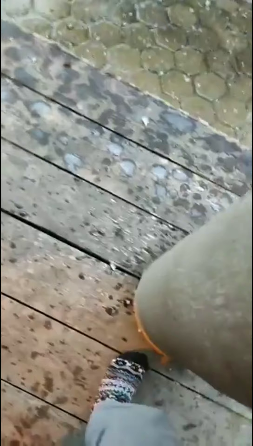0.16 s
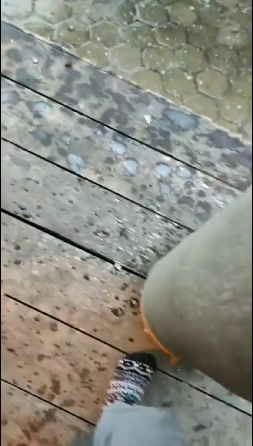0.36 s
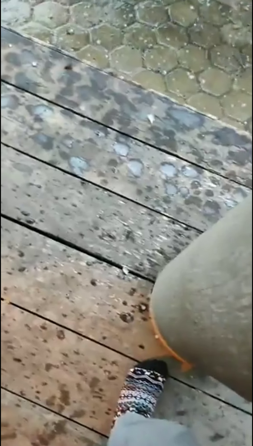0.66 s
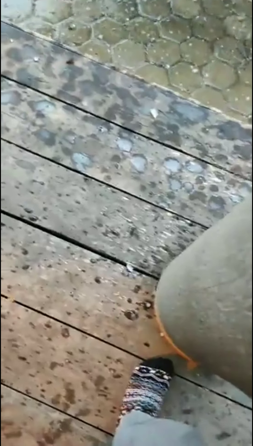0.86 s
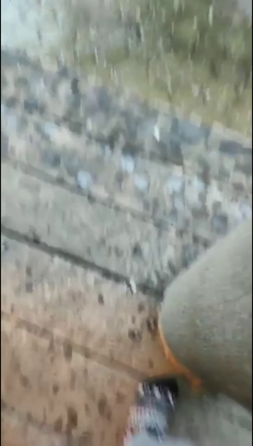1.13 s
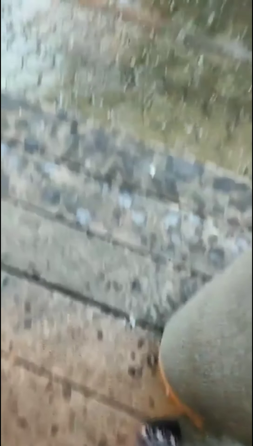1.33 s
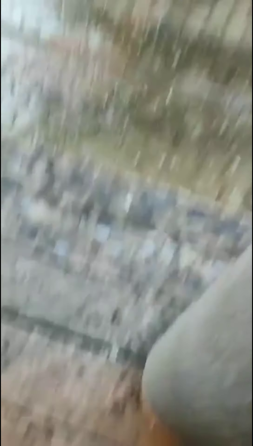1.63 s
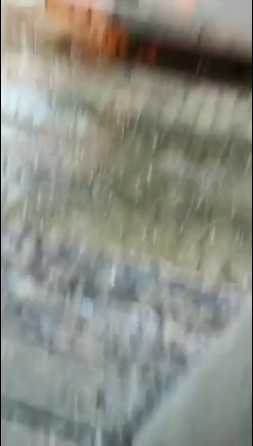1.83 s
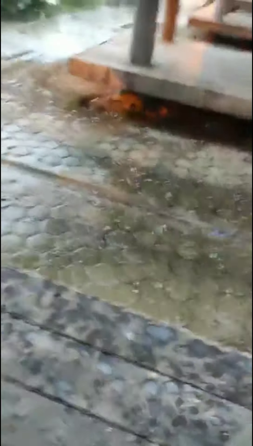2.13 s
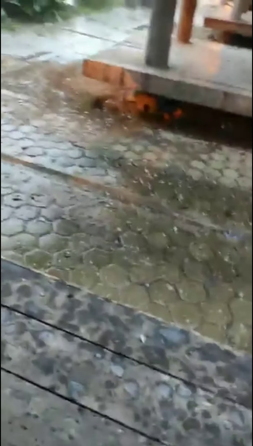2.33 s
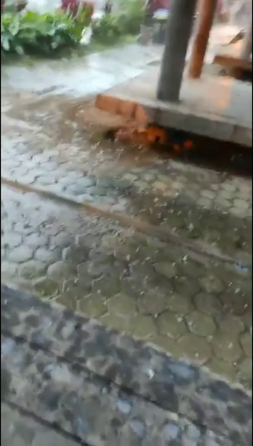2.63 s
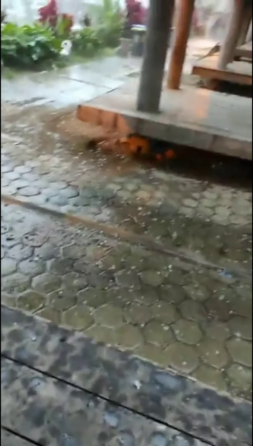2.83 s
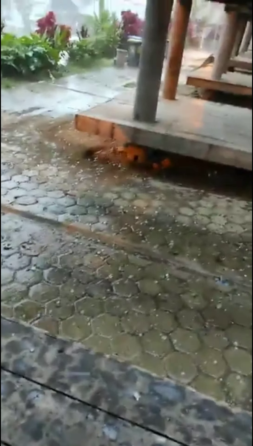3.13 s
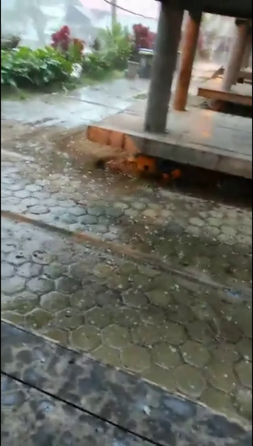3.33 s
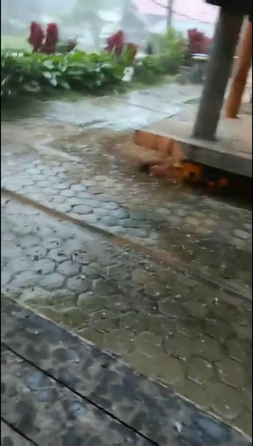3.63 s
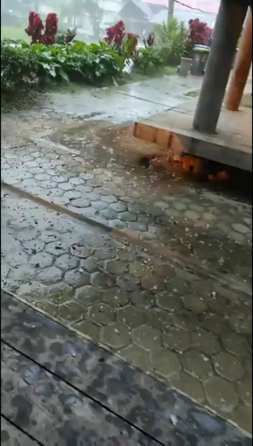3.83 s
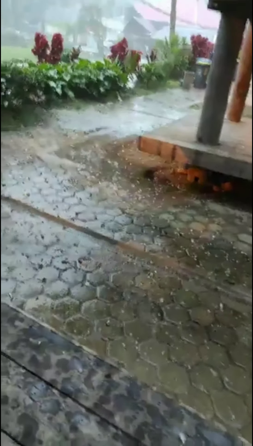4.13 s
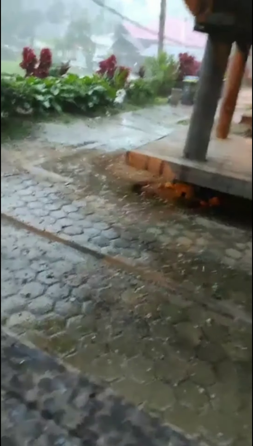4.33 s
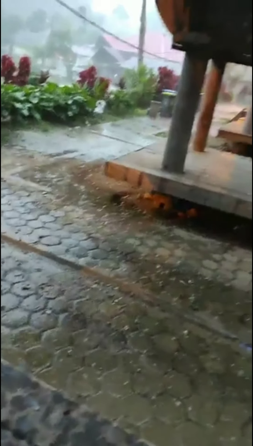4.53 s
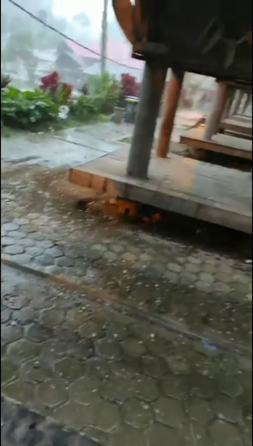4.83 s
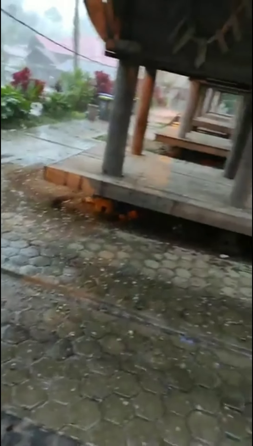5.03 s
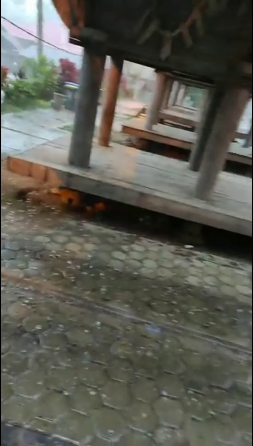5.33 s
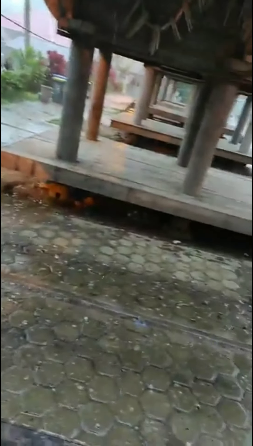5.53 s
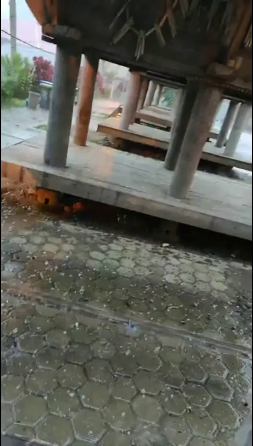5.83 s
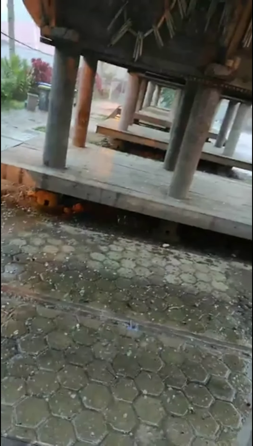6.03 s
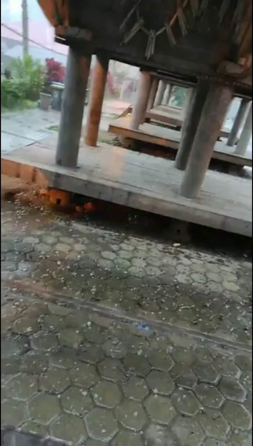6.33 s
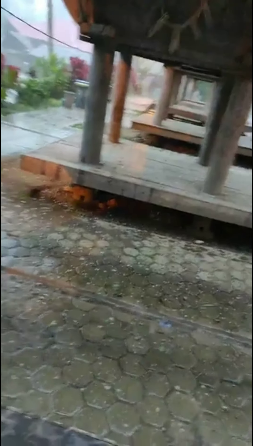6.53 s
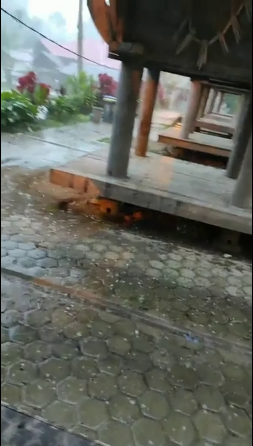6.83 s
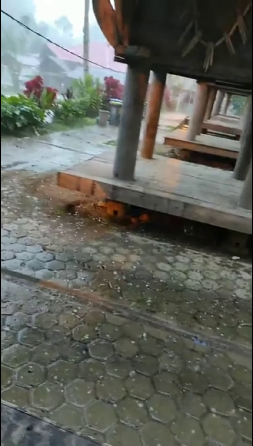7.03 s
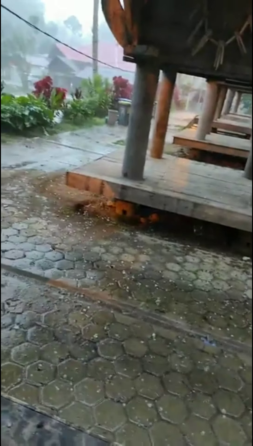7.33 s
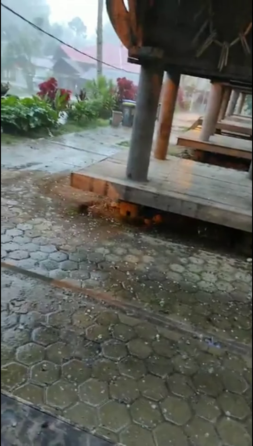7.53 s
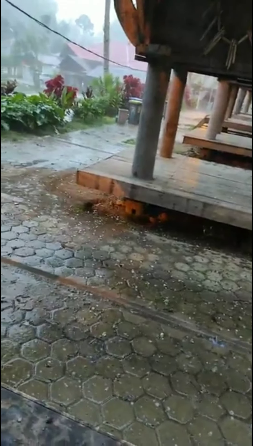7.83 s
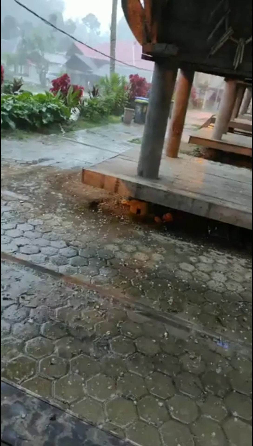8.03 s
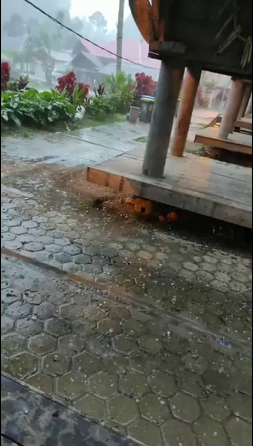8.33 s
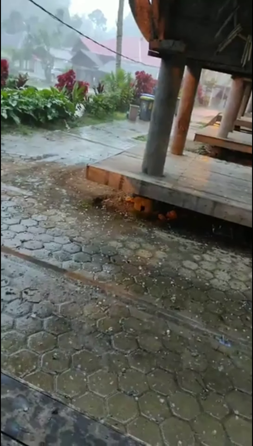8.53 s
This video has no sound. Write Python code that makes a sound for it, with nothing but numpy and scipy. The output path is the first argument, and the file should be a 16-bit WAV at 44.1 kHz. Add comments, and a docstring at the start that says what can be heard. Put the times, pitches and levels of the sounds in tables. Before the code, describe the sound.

For nearly nine seconds heavy rain and small hail pour steadily around a wooden veranda beside wet paving. A dull, low roof drumming lies under a wide, shifting hiss from the yard. Run-off slaps the paving from the start, several irregular gushes a second, strong near 0.3, 2.9, 4.9, 5.5 and 7.1, each thinning into droplets. Fine pellets tick densely, thickening with each gush, among short drop pings on boards. Hollow wooden knocks cluster at 0.3 to 0.9 and about 3, then return near 5.2 and 7.1. Hard hailstones crack close by around 2.3, 3.5, 4.1 and 7.8; big drops sparkle at 5.9 and 6.2. The hollow patter rises in pitch from about 2 seconds, is highest near 5.3 to 6.2, then drops by 7.2 as the listener turns. Bright, wide stereo; the downpour continues to the end without stopping.

```python
"""Downpour with small hail

A downpour with small hail, heard from the edge of a roofed wooden veranda above wet paving.
The roofs drum with a dull roar of random impacts shaped by broad spectra; heavier knocks ring board modes.
Yard rain is a wash of filtered impacts, and gushes of run-off are decaying bursts of droplet noise.
Fine pellets and close hailstones are noise through resonances, and big drops burst into sparkles.
Drops on the boards and short high pings are random clicks through lightly damped resonances.
"""
import sys
import numpy as np
from scipy import signal
from scipy.fft import rfft, irfft, next_fast_len
from scipy.io import wavfile

SR = 44100
rng = np.random.default_rng(int(sys.argv[2]) if len(sys.argv) > 2 else 0)


def to_wav(s):
    """Save 16-bit WAV."""
    ch = np.atleast_2d(s).T  # columns
    pcm = np.round(np.clip(ch, -1, 1) * 32767)  # PCM
    wavfile.write(sys.argv[1], SR, pcm.astype(np.int16))


N = 382788
TIME = np.arange(N) / SR

# Gushes of run-off slapping the paving. Each row: start in seconds, relative level in dB,
# brightness in dB per octave about 6 kHz.
GUSHES = [(.005, -21.5, -3), (.052, -19.5, -6), (.276, -17.5, -2), (.365, -17.5, -4.5), (.523, -22, -5),
          (.592, -20.5, -2.5), (.73, -24, -7), (.993, -18.5, -2), (1.128, -20.5, -4.5), (1.195, -21, -4),
          (1.26, -21, -3), (1.313, -22, -7), (1.44, -26, -4), (1.595, -18, -6), (1.65, -27, -3),
          (1.88, -19, -4.5), (1.99, -25, -6), (2.098, -26, .5), (2.28, -21, -5), (2.479, -20.5, -4.5),
          (2.682, -19, -3), (2.795, -19, -3), (2.914, -17, -3), (2.98, -24, -8), (3.157, -19, -4),
          (3.492, -24.5, -6), (3.77, -23.5, -1), (3.913, -21.5, -2), (4.113, -25, -6), (4.386, -21.5, -4),
          (4.51, -21, -8), (4.63, -20, -1), (4.853, -17.5, -1.5), (5.224, -18, -2), (5.48, -17.5, -1),
          (5.503, -28, 0), (5.605, -20, -2), (5.865, -20, 0), (5.92, -24, -8.5), (6.02, -28, 6),
          (6.19, -18, -2), (6.33, -26, -1), (6.467, -23, -5), (6.907, -23, 2), (6.993, -20, -5),
          (7.06, -16, -2.5), (7.09, -24, -7), (7.185, -29, -4), (7.368, -21, 0), (7.39, -18.5, -3),
          (7.973, -25, 0), (8.108, -19, -3), (8.238, -20, -3), (8.377, -23, -4), (8.48, -24, -1)]
# a gush of the usual level dies in SPRAY_T60_S; a heavier one falls in one lump and is over sooner
USUAL_GUSH_DB, SPRAY_T60_S = -21, 0.82
SHORTER_PER_DB = 0.1044   # fall of the log decay time per dB


def from_db(db):
    """Decibels express amplitude ratios on a logarithmic scale; this returns the gain."""
    return 10 ** (np.asarray(db) / 20)


def rms_one(x):
    """Normalization by the root mean square gives signals equal mean power."""
    return x / np.sqrt(np.mean(x ** 2) + 1e-20)


def over_bins(points):
    """A spectral curve is interpolated over log frequency and read at every FFT bin."""
    hz, value = np.transpose(points)
    bins = np.maximum(np.fft.rfftfreq(next_fast_len(N), 1 / SR), 1)
    return np.interp(np.log(bins), np.log(np.sort(hz)), value)


def filtered(x, gain):
    """Linear filtering multiplies each frequency bin by one gain."""
    size = next_fast_len(N)
    return irfft(rfft(x, size) * gain, size)[..., :N]


def coloured(x, spectrum):
    """Spectral shaping turns a flat excitation into a coloured one; rms 1."""
    return rms_one(filtered(x, from_db(over_bins(spectrum))))


def in_bands(x, count=12):
    """Complementary overlapping bands sum back to the whole; yields (centre in Hz, band)."""
    centres = np.geomspace(1400, 13000, count)
    whole = rfft(x, next_fast_len(N))
    for hz, share in zip(centres, np.eye(count)):
        gain = over_bins(np.c_[centres, share])
        yield hz, irfft(whole * gain, next_fast_len(N))[:, :N]


def resonance(x, hz, width_hz):
    """A two-pole resonator answers most strongly at its own frequency, here with peak gain 1."""
    radius = np.exp(-np.pi * width_hz / SR)
    zeros = np.array([1, 0, -1]) * (1 - radius * radius) / 2
    poles = [1, -2 * radius * np.cos(2 * np.pi * hz / SR), radius * radius]
    return signal.lfilter(zeros, poles, x + 1e-18)


def swell(t60, rise_s):
    """Damping makes a sound die exponentially after a quick rise; one second of envelope."""
    age = TIME[:SR]
    return (1 - np.exp(-age / rise_s)) * from_db(-60 * age / t60)


def drift(per_s):
    """A random modulation joins per_s random values a second by straight lines; rms 1."""
    steps = int(9 * per_s) + 4
    return rms_one(np.interp(TIME * per_s, np.arange(steps), rng.standard_normal(steps)))


def add(out, s, sound):
    """By superposition, a sound starting at s seconds is summed into out."""
    start = int(np.clip(round(s * SR), 0, N - 1))
    out[..., start:start + sound.shape[-1]] += sound[..., :N - start]


def impacts(per_s, spread_db):
    """A random pulse process: independent impacts of varied size on both sides; rms 1."""
    born = rng.random((2, N)) < per_s / SR
    sizes = from_db(spread_db * np.minimum(rng.exponential(1, (2, N)), 4))
    return rms_one(born * sizes * rng.choice([-1, 1], (2, N)))


def mode_cluster(hz, spacing, flank_db):
    """Modal superposition: a main mode between two flanking ones, out of step at the ports; 1 s, rms 1."""
    ratios = 1 + spacing * np.array([0, -1, 1]) * rng.uniform(.6, 1.4, 3)
    phases = rng.uniform(0, 2 * np.pi, (3, 1, 1)) + .5 * rng.standard_normal((3, 2, 1))
    gains = from_db([0, flank_db, flank_db])
    modes = [gain * np.sin(2 * np.pi * hz * ratio * TIME[:SR] + phase)
             for gain, ratio, phase in zip(gains, ratios, phases)]
    return rms_one(sum(modes))


def rattle(hz, width_hz):
    """Gritty contact is noise exciting a resonance, partly coherent at the two ports; 1 s, rms 1."""
    shake = rng.standard_normal((2, SR)) + rng.standard_normal(SR)
    once = resonance(shake, hz, width_hz)
    return rms_one(resonance(once, hz, width_hz))


def gush_decay(db):
    """A gush decays exponentially, the faster the higher its level."""
    return swell(SPRAY_T60_S * np.exp(SHORTER_PER_DB * (USUAL_GUSH_DB - db)), rise_s=0.0066)


def roofs(rumble_db, patter_db):
    """Random impacts drum on the roofs; spatial coherence makes the long waves alike on both sides."""
    # Slow swell of the shower. Each row: time in seconds, rumble and patter levels in dB before the trims.
    shower = [(0, -28.5, -22.5), (.6, -27.5, -21), (2.1, -27.5, -24), (3.0, -27, -23.5), (4.0, -28, -23),
              (5.0, -28, -24.5), (5.7, -27, -23.5), (6.7, -28.5, -24), (7.2, -27, -24), (7.8, -29.5, -24),
              (8.68, -28.5, -23.5)]
    # Spectra of the two layers. Each row: frequency in Hz, relative level in dB.
    rumble_spectrum = [(22, -44), (45, -41), (70, -17), (100, -10), (165, -1.5), (250, 0), (340, 1),
                       (450, -0.5), (650, -21), (1500, -47)]
    patter_spectrum = [(40, -60), (200, -49), (380, -12), (520, -2), (720, 1.3), (900, -4.5), (1200, -2),
                       (1500, -1.5), (1740, -3), (1900, -14.5), (2800, -36), (6000, -28.5)]
    # Likeness of the two sides. Each row: frequency in Hz, correlation.
    likeness = [(40, 1), (120, 1), (350, 0.96), (500, 0.5), (700, 0.21), (1000, 0.52), (1400, 0.046),
                (2200, 0.18)]
    s, rumble, patter = np.transpose(shower)
    alike = np.clip(over_bins(likeness), -1, 1)
    out = 0
    for spectrum, level_db in ((rumble_spectrum, rumble + rumble_db), (patter_spectrum, patter + patter_db)):
        mid, side = impacts(per_s=5000, spread_db=3.0)
        common = filtered(mid, np.sqrt(1 + alike))
        opposed = filtered(side, np.sqrt(1 - alike)) * [[1], [-1]]
        out = out + coloured(common + opposed, spectrum) * from_db(np.interp(TIME, s, level_db))
    return out


def hollow_patter(width_hz):
    """Heterodyne filtering: a narrow band of the patter slides in pitch as the listener turns."""
    # The band that stands out. Each row: time in seconds, centre in Hz, level in dB.
    hollow = [(0, 560, -34), (.4, 547, -32.5), (1.0, 590, -36), (1.7, 640, -36), (2.4, 960, -30),
              (3.05, 1000, -34), (3.8, 1000, -32), (4.5, 1070, -41), (5.3, 1510, -30.5), (6.2, 1480, -34),
              (6.7, 1390, -40), (7.15, 760, -33.5), (7.6, 760, -46)]
    s, hz, db = np.transpose(hollow)
    drops = impacts(per_s=2000, spread_db=1.5)
    drops = drops + 0.24 * drops[::-1]   # each port hears some of the other side
    carrier = np.exp(2j * np.pi * np.cumsum(np.interp(TIME, s, hz)) / SR)
    lowpass = signal.butter(2, width_hz / 2, fs=SR, output="sos")
    band = signal.sosfilt(lowpass, drops / carrier) * carrier   # shift down, filter, shift back
    return from_db(np.interp(TIME, s, db)) * rms_one(band.real)


def knocks(level_db, t60, thud_db, thud_t60, tap_db, tap_t60, relative_width):
    """Modal excitation: a larger stone's hard tap and broad thud set a few modes of a roof board ringing."""
    # Heavier knocks on the roof. Each row: start in seconds, level in dB before level_db, pitch in Hz.
    heavy_knocks = [(.058, -18.5, 637), (.322, -16.5, 573), (.378, -16.5, 1386), (.385, -16.5, 563),
                    (.635, -21, 290), (.858, -17, 1496), (.875, -18, 796), (1.888, -21, 1310),
                    (2.281, -22, 404), (2.884, -21, 917), (2.99, -16, 1060), (3.061, -18, 1020),
                    (3.138, -17.5, 982), (3.516, -20, 928), (4.53, -21, 857), (4.631, -24, 262),
                    (5.219, -20.5, 907), (5.277, -19, 1500), (5.87, -20.5, 1266), (7.104, -20, 817),
                    (7.125, -19, 657), (7.175, -21, 1310), (7.298, -20.5, 297), (8.29, -17.5, 694)]
    out = np.zeros((2, N))
    tap = from_db(tap_db) * swell(tap_t60, rise_s=0.0008)
    thud = from_db(thud_db) * swell(thud_t60, rise_s=0.0012)
    for s, db, hz in heavy_knocks:
        board = mode_cluster(hz, spacing=0.1095, flank_db=-5) * swell(t60, rise_s=0.0011)
        blow = (tap + thud) * rattle(hz, hz * relative_width)
        add(out, s, from_db(db + level_db) * (board + blow))
    # the boards give no deep bass
    return signal.sosfilt(signal.butter(2, 130, "high", fs=SR, output="sos"), out)


def far_rain(level_db, patchy_db, patches_per_s):
    """Dense independent impacts over the yard merge into a noise wash whose colour keeps shifting."""
    # Spectrum of the wash. Each row: frequency in Hz, relative level in dB.
    wash_spectrum = [(40, -50), (300, -20), (1000, -2.5), (2200, 4), (2800, 2), (3400, 3.1), (4500, 1.5),
                     (5600, 1.5), (7000, -2), (9000, -5), (12000, -8), (16000, -9.5)]
    wash = coloured(impacts(per_s=16000, spread_db=2.5), wash_spectrum)
    shifting = sum(band * from_db(patchy_db * drift(patches_per_s)) for hz, band in in_bands(wash))
    return from_db(level_db) * rms_one(shifting)


def run_off(level_db, right_db, colour_db, clump_db, clumps_per_s, sputter_db):
    """Incoherent sources add in power: each gush has its own colour and clumps of droplets that thin out."""
    # Spectrum of the spray. Each row: frequency in Hz, relative level in dB.
    spray_spectrum = [(40, -50), (300, -30), (700, -1.5), (1500, 5.5), (2300, -0.5), (3500, 4), (5500, 6),
                      (7000, 4), (9000, 1), (12000, 1), (16000, -21.5)]
    droplets = coloured(impacts(per_s=9000, spread_db=3.0), spray_spectrum)
    decays = [gush_decay(db) ** 2 for s, db, brightness in GUSHES]
    out = 0
    for hz, band in in_bands(droplets):
        octaves = max(np.log2(hz / 6000), -1)
        power = np.zeros(N)
        for (s, db, brightness), decay in zip(GUSHES, decays):
            band_db = db + brightness * octaves + colour_db * rng.standard_normal()
            add(power, s, from_db(band_db) ** 2 * decay)
        out = out + band * np.sqrt(power) * from_db(clump_db * drift(clumps_per_s))
    sputter = sputter_db * drift(clumps_per_s)   # whole clumps land at once, across all bands
    balance_db = right_db * np.array([[-1], [1]])
    return from_db(level_db + sputter + balance_db) * out


def wall_echo(x):
    """Comb filtering: one short, changing reflection shifts the colour of the roofs, yard and run-off."""
    # Nearest wall as the listener turns. Each row: time in seconds, echo delay in ms, echo strength (0-1).
    wall = [(2.4, 0.86, 0.02), (3.1, 1.07, 0.08), (3.8, 1.23, 0.11), (4.6, 0.94, 0.06), (5.4, 0.79, 0.06),
            (6.4, 0.81, 0.08), (7.1, 0.98, 0.08), (8.68, 1.08, 0.12)]
    s, delay_ms, strength = np.transpose(wall)
    read_at = TIME - np.interp(TIME, s, delay_ms) / 1000
    echo = np.array([np.interp(read_at, TIME, side) for side in x])
    # long waves pass round the wall
    echo = signal.sosfilt(signal.butter(1, 180, "high", fs=SR, output="sos"), echo)
    return x + np.interp(TIME, s, strength) * echo


def fine_hail(level_db, per_s, gush_gain, spread_db, q_factor, skid_t60, count=20):
    """Contact noise excites resonances set by pellet size; every gush brings more ticks, and harder ones."""
    surge = np.ones(N)
    for s, db, brightness in GUSHES:
        add(surge, s, gush_gain * from_db(db - USUAL_GUSH_DB) * gush_decay(db))
    energy = impacts(per_s * surge, spread_db) ** 2 * surge
    energy = energy + 0.31 * energy[::-1]   # the far port hears it weaker
    dealt = rng.integers(0, count, N)   # which pitch each instant belongs to
    fade = from_db(-120 / (skid_t60 * SR))   # energy kept per sample: 60 dB lost in skid_t60
    grit = rng.standard_normal((2, N))
    ticks = 0
    for k, hz in enumerate(np.geomspace(1900, 11000, count)):
        skid = signal.lfilter([1], [1, -fade], energy * (dealt == k) + 1e-18)
        contact = np.sqrt(skid) * grit
        ticks = ticks + resonance(contact, hz, hz / q_factor) / np.sqrt(hz)
    return from_db(level_db) * rms_one(ticks)


def pings(level_db, per_s, spread_db, low_hz, high_hz, q_factor, count=36):
    """Impulse response: random clicks excite lightly damped resonances, giving short pitched pings."""
    clicks = impacts(per_s, spread_db)
    dealt = rng.integers(0, count, N)   # which pitch each instant belongs to
    clicks = clicks + 0.17 * clicks[::-1]   # the far port hears them weaker
    pitches = np.geomspace(low_hz, high_hz, count) * rng.uniform(.98, 1.02, count)
    rings = [resonance(clicks * (dealt == k), hz, hz / q_factor) / hz for k, hz in enumerate(pitches)]
    return from_db(level_db) * rms_one(sum(rings))


def spatter(level_db, t60):
    """Amplitude modulation: a big drop bursting close by is a decaying envelope on a sparkle of pings."""
    # Bursting drops. Each row: start in seconds, level in dB before level_db.
    big_drops = [(.283, -24), (1.26, -26), (1.595, -24), (2.025, -27), (2.093, -22), (2.915, -26),
                 (3.025, -24), (3.14, -23), (4.455, -25), (4.617, -23), (5.575, -25), (5.863, -19),
                 (6.192, -17), (6.996, -22), (7.402, -21), (8.245, -29)]
    burst = np.zeros(N)
    for s, db in big_drops:
        add(burst, s, from_db(db) * swell(t60, rise_s=.003))
    sparkle = pings(level_db, per_s=2400, spread_db=0.5, low_hz=10000, high_hz=14500,
                    q_factor=18, count=10)
    return burst * sparkle


def close_hail(level_db, clack_width, crack_width, crack_db, crack_t60, ring_db):
    """Impact excitation: a wide crack, then a clack and ring about the stone's pitch; widths are shares of it."""
    # Close hailstones. Each row: start in seconds, level in dB before level_db, pitch in Hz,
    # decay time t60 in seconds, left-over-right level in dB.
    hailstones = [(.064, -18, 4660, .06, -4), (1.0535, -18, 8600, .025, 3), (1.4422, -17, 8600, .02, 5),
                  (1.599, -20, 3450, 0.13, -5), (2.105, -13, 7580, .04, -5), (2.2656, -8, 1570, 0.031, -2),
                  (2.2835, -12, 1510, .02, 0), (2.3162, -18, 4900, .02, -7), (2.72, -21, 7900, .04, -1),
                  (2.8095, -20, 7600, 0.023, 3), (2.9562, -16, 3530, .025, 2),
                  (2.987, -16, 5020, 0.029, -2), (3.4965, -12, 5300, .012, -8),
                  (3.5047, -7.5, 5200, .028, 2), (4.1203, -10, 6700, .021, 6),
                  (4.4012, -19, 6700, .018, -9), (4.7145, -13.5, 4450, .035, -3),
                  (6.1925, -13, 9700, .045, 8), (6.198, -17, 7200, .05, 0), (6.195, -24, 2660, .14, 0),
                  (6.473, -14, 4580, .055, 3), (6.997, -16, 4240, .12, 3), (6.998, -24, 6700, .08, -1),
                  (7.8408, -8, 5800, .017, 7), (7.844, -17, 8700, .017, 3), (8.124, -17, 6730, 0.056, 1),
                  (8.489, -18.5, 8800, .03, 7)]
    out = np.zeros((2, N))
    for s, db, hz, t60, pan_db in hailstones:
        clack = rattle(hz, hz * clack_width)
        ring = from_db(ring_db) * mode_cluster(hz, spacing=0.08, flank_db=-15)
        body = (clack + ring) * swell(t60, rise_s=0.00055)
        crack = from_db(crack_db) * rattle(hz, hz * crack_width) * swell(crack_t60, rise_s=0.0002)
        side_db = np.array([[.5], [-.5]]) * pan_db
        add(out, s, from_db(db + level_db + side_db) * (body + crack))
    return out


def scene():
    """Superposition of the roofs, the yard, and the sounds close by."""
    roar = roofs(rumble_db=-0.55, patter_db=-0.2) + hollow_patter(width_hz=203)
    roar = roar + knocks(level_db=-5.0, t60=0.28, thud_db=-3.5, thud_t60=0.5,
                         tap_db=1, tap_t60=0.028, relative_width=0.99)
    yard = far_rain(level_db=-21.5, patchy_db=1.7, patches_per_s=40)
    gushes = run_off(level_db=1.28, right_db=0.0, colour_db=1.0, clump_db=1.1,
                     clumps_per_s=140, sputter_db=0.3)
    pellets = fine_hail(level_db=-30.5, per_s=170, gush_gain=1.3, spread_db=-0.8,
                        q_factor=5.8, skid_t60=0.015)
    on_boards = pings(level_db=-32.0, per_s=40, spread_db=0.5, low_hz=279, high_hz=1753, q_factor=26)
    high_pings = pings(level_db=-34.0, per_s=200, spread_db=1.0, low_hz=1999, high_hz=6440, q_factor=51)
    bursts = spatter(level_db=3.0, t60=0.14)
    stones = close_hail(level_db=-2.5, clack_width=0.18, crack_width=1.4,
                        crack_db=-1, crack_t60=0.015, ring_db=-4.5)
    return wall_echo(roar + yard + gushes) + pellets + on_boards + high_pings + bursts + stones


def record(dry):
    """Frequency response and saturation: each port colours the sound, high peaks round, the top is cut."""
    # Colour of the two microphone ports. Each row: frequency in Hz, gain in dB.
    left_port = [(1500, 0.5), (2200, -0.5), (4500, -1), (6000, -5), (6700, 2), (7100, -2.5), (8200, 1),
                 (8800, 5), (9500, 0.5), (9750, -12), (14000, -8), (15700, -16)]
    right_port = [(400, 0), (1500, 0), (3500, 1), (5300, -0.2), (5600, -1.5), (6700, 5.5), (7000, 4.5),
                  (7450, 6.5), (8200, 1), (9450, -1), (9700, -15), (14000, -7), (15700, -15)]
    cutoff_hz = 15650
    heard = filtered(dry, from_db([over_bins(left_port), over_bins(right_port)]))
    heard = heard / (1 + (heard / .92) ** 8) ** (1 / 8)   # peaks bend towards .92
    return signal.sosfilt(signal.ellip(12, .1, 90, cutoff_hz, fs=SR, output="sos"), heard)


dry = scene()
out = record(dry)
to_wav(out)
```